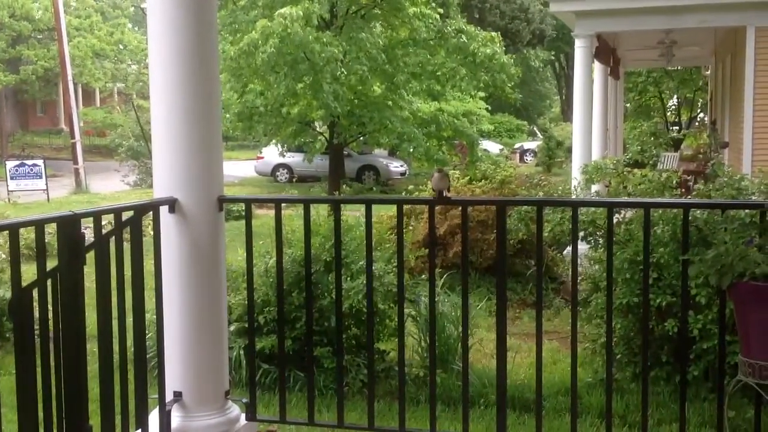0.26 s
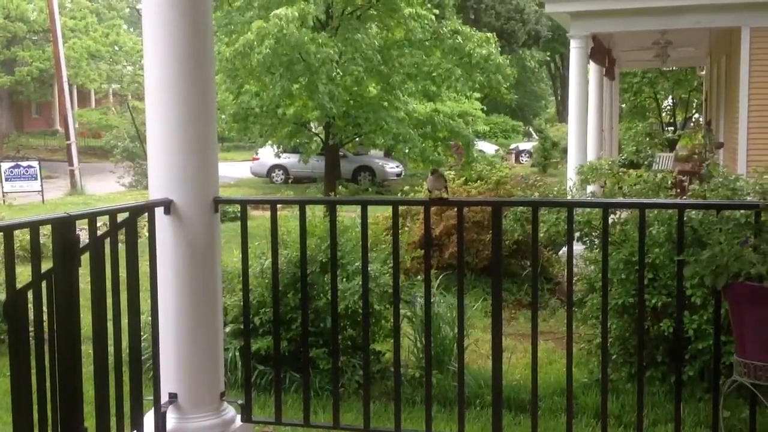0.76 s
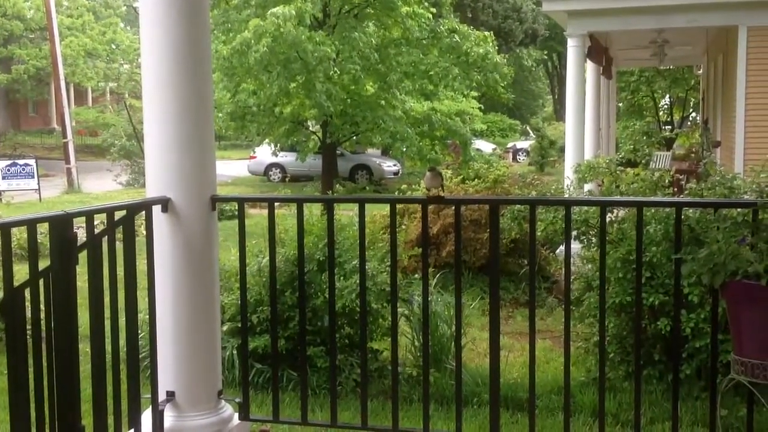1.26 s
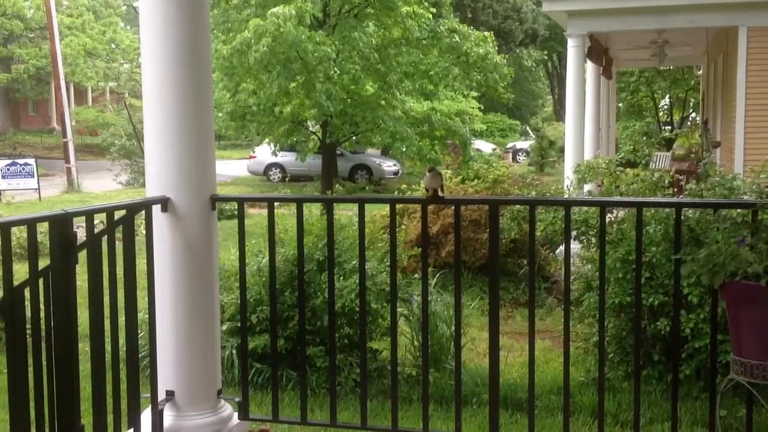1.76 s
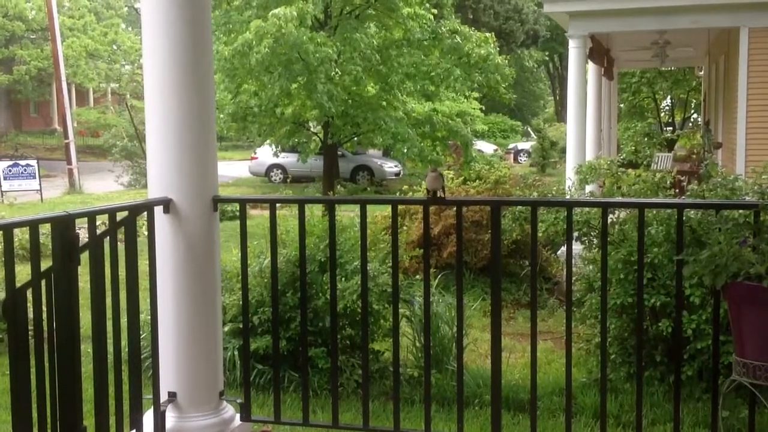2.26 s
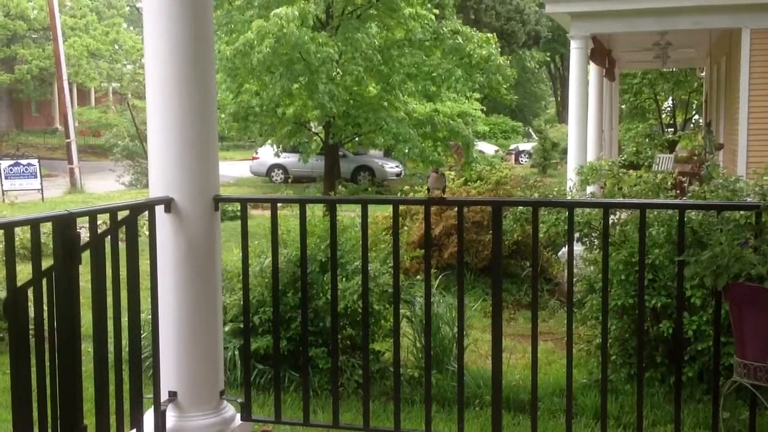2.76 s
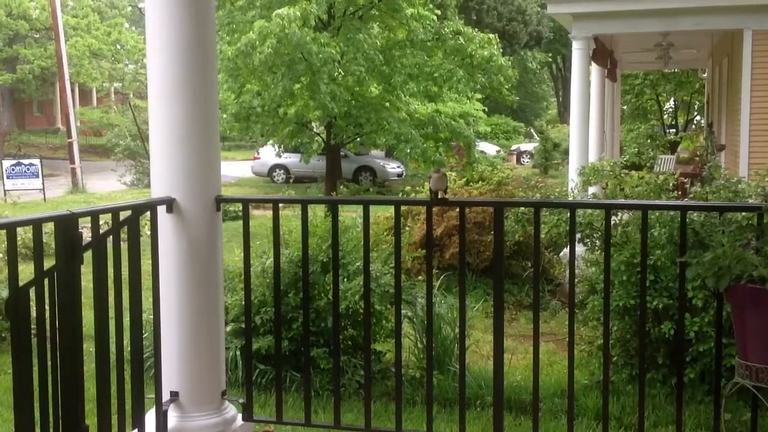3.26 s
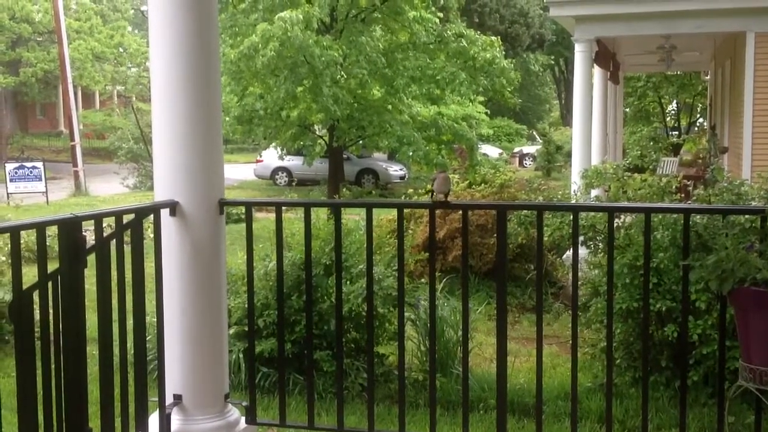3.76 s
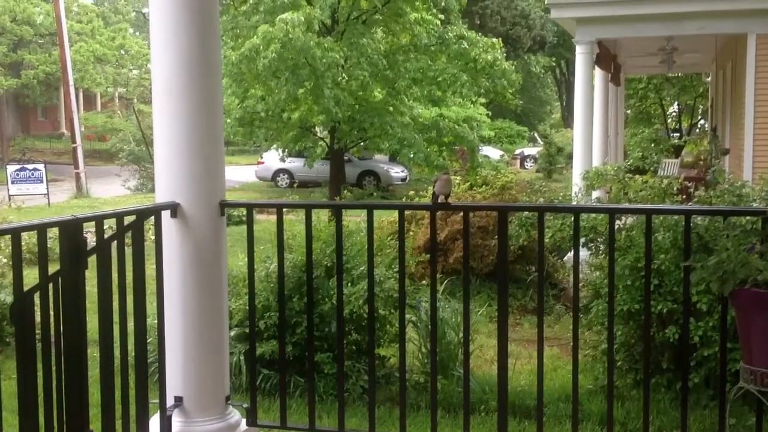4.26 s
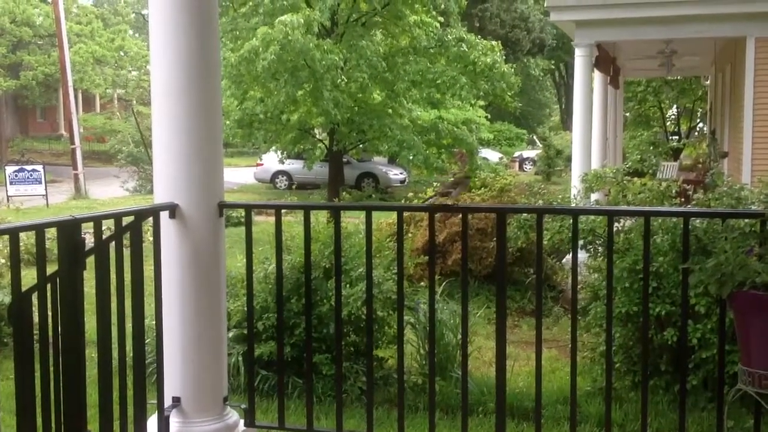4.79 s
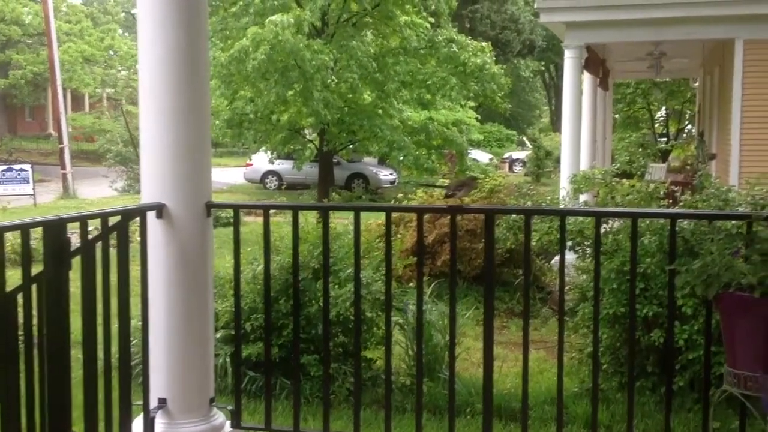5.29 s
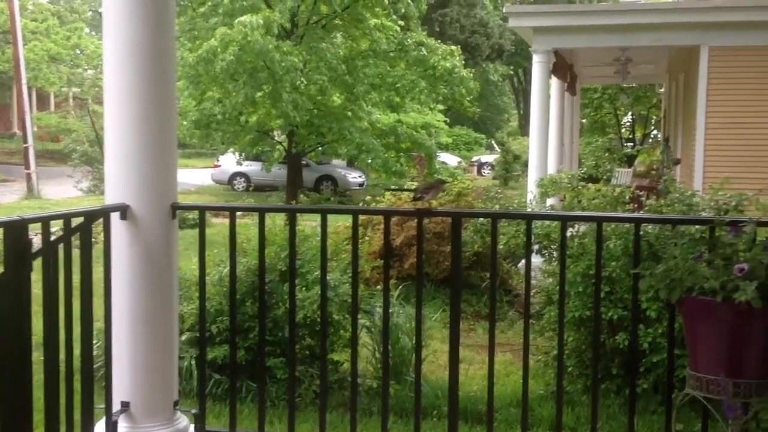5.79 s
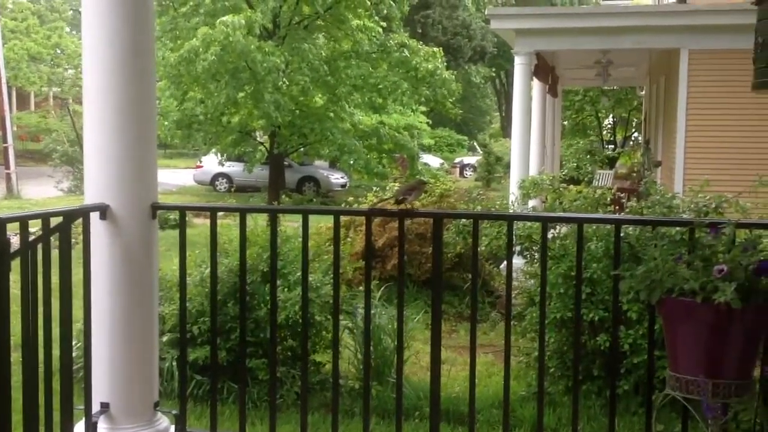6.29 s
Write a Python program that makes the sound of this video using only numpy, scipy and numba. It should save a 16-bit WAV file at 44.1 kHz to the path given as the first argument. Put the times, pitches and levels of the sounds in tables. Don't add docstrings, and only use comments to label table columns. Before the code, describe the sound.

A mockingbird a few metres away scolds with six harsh falling rasps over soft suburban hum, faint far birdsong and small camera ticks.

```python
import sys
import numpy as np
from scipy import signal
from scipy.fft import rfft, irfft
from scipy.io import wavfile
from scipy.ndimage import uniform_filter1d
from numba import njit

SR = 44100
rng = np.random.default_rng(int(sys.argv[2]) if len(sys.argv) > 2 else 0)


def undo_db(level):
    steps = np.asarray(level, float) / 20
    return 10 ** steps


def unload_audio(sound):
    columns = np.transpose(np.atleast_2d(sound))
    steps = np.round(np.clip(columns, -1, 1) * 32767)
    wavfile.write(sys.argv[1], SR, steps.astype(np.int16))


N = 288414


def level(x, rms_db):
    return x * undo_db(rms_db) / np.sqrt(np.mean(x ** 2))


def colour(x, spectrum):
    hz, db = np.transpose(spectrum)
    bins_hz = np.arange(len(x) // 2 + 1) * SR / len(x) + 1
    gain = undo_db(np.interp(np.log(bins_hz), np.log(hz), db))
    return irfft(rfft(x) * gain, len(x))


def walk(rate_hz, count):
    k = max(int(SR / rate_hz), 1)
    return level(uniform_filter1d(uniform_filter1d(rng.standard_normal(count), k), k), 0)


def turns(hz):
    return 2 * np.pi * np.cumsum(hz) / SR


def bouts(rows, calm_db):
    t = np.arange(N) / SR
    power = undo_db(2 * calm_db)
    for s, spread_s, db in rows:
        power = power + undo_db(2 * db) * np.exp(-((t - s) / spread_s) ** 2)
    return np.sqrt(power)


def echo(x, t60_s, db, dull_hz):
    t = np.arange(SR) / SR
    noise = rng.standard_normal(SR)
    low = signal.lfilter(*signal.butter(2, dull_hz, fs=SR), noise)
    tail = low + (noise - low) * np.exp(-t / 0.051)
    tail = tail * undo_db(-60 * t / t60_s) * np.clip(t / 0.0043, 0, 1)
    return signal.fftconvolve(x, tail * undo_db(db) / np.sqrt(np.sum(tail ** 2)))[:N]


# f/Hz, level/dB per Hz
HUM = [(18, -75), (30, -44), (148, -2), (640, -4), (900, -7), (2600, -11.5), (5170, -19.5), (15500, -29)]
# t/s, spread/s, level/dB
LEAVES = [
    (.52, .04, -67),
    (1.42, 0.11, -73),
    (3.93, 0.083, -63),
    (5.05, .25, -68),
    (6.35, .2, -68),
]


def suburb():
    spectrum = rfft(colour(rng.standard_normal(N), HUM))
    bins_hz = np.arange(N // 2 + 1) * SR / N
    swell = walk(7.5, N)
    hum = 0
    for low_hz in 25 * 2 ** np.arange(0, 10):
        band = irfft(spectrum * ((bins_hz >= low_hz) & (bins_hz < 2 * low_hz)), N)
        hum = hum + band * undo_db(0.21 * swell + 1.42 * walk(8.1, N))
    leaves = colour(rng.standard_normal(N), [(1500, -22), (4000, 11), (9000, 0), (15000, 4)])
    return level(hum, -57.5) + level(leaves, 0) * bouts(LEAVES, calm_db=-77.5)


# t/s, spread/s, level/dB
CHORUS = [
    (0, 0.044, -61.5),
    (.9, 0.54, -68.5),
    (3.2, 0.57, -62),
    (4.35, 0.091, -71),
    (6.54, 0.52, -60),
]


def far_chorus():
    spectrum = [(900, -26), (1600, 7.5), (2500, -20.5), (3600, 2.0), (4500, -7.0), (6000, -23)]
    wash = level(colour(rng.standard_normal(N), spectrum), 0)
    return wash * bouts(CHORUS, calm_db=-86.5) * undo_db(0.47 * walk(1.3, N))


# t/s, length/s, first f/Hz, last f/Hz, level/dB
CLEAR_NOTES = [(1.351, 0.077, 3160, 4270, -54.5), (1.363, .06, 3950, 4580, -55),
               (0.133, .61, 7120, 6410, -74.5), (1.389, 0.058, 2520, 2900, -56),
               (1.409, .027, 2200, 2300, -48.5), (2.187, 0.087, 3754, 3910, -66),
               (2.375, .036, 7900, 7800, -70), (5.038, 0.072, 3000, 3520, -55.5),
               (5.05, 0.055, 2610, 2500, -52.5), (5.116, 0.032, 4000, 3970, -61),
               (5.753, 0.044, 3615, 3524, -44.5), (5.79, 0.025, 2065, 1890, -49),
               (5.826, 0.056, 2614, 2594, -46), (5.935, .04, 2570, 2620, -70)]
# t/s, length/s, first f/Hz, last f/Hz, level/dB
BURRED_NOTES = [(0, 0.03, 3440, 3420, -55), (4.983, .028, 6500, 6390, -66),
                (5.029, .038, 5000, 5560, -59.5), (5.742, 0.03, 4250, 5000, -64),
                (5.758, .045, 3185, 2915, -52), (5.772, 0.065, 3600, 2665, -47.5),
                (5.887, .073, 4100, 4600, -63), (5.927, 0.062, 4400, 3900, -56),
                (5.955, .025, 3470, 3330, -65)]


def single_notes():
    clear_rough, burred_rough = 0.21, 0.86
    return [(*r, clear_rough) for r in CLEAR_NOTES] + [(*r, burred_rough) for r in BURRED_NOTES]


def whistle(length_s, first_hz, last_hz, db, rough):
    warble_hz, attack_s = 16, .006
    u = np.arange(int(length_s * SR)) / (length_s * SR)
    n = len(u)
    burr, waver, warble = walk(1200, 30000)[:n], walk(103, 30000)[:n], walk(120, 30000)[:n]
    rough = np.clip(rough, 0, 1)
    hz = first_hz + (last_hz - first_hz) * np.clip(1.6 * u, 0, 1) + warble_hz * warble
    swell = np.clip(u / max(0.088, attack_s / length_s), 0, 1) * (1 - u ** 3)
    swell = swell * undo_db(3.1 * min(length_s / 0.065, 1) * waver)
    tremor = np.sqrt(1 - rough ** 2) + rough * burr
    return np.sqrt(2) * undo_db(db) * swell * tremor * np.sin(turns(hz))


def songbirds():
    dry = np.zeros(N)
    for start_s, *note in single_notes() + churrs() + warbler() + piper():
        song = whistle(*note)
        i = int(start_s * SR)
        dry[i:i + len(song)] += song
    nearer_from_s, nearer_echo_db = 4.9, -8
    sent = dry * np.where(np.arange(N) / SR > nearer_from_s, undo_db(nearer_echo_db), 1)
    return dry + echo(sent, t60_s=0.71, db=-1.5, dull_hz=11700)


# t/s, peak level/dB, f/Hz, width/Hz
TICKS = [
    (0.513, -43, 2950, 5000),
    (1.585, -68, 46.1, 60),
    (2.365, -38, 5300, 1800),
    (3.674, -45, 403, 200),
    (6.422, -36.5, 2320, 892),
    (6.422, -40, 6060, 1200),
    (6.422, -53, 11070, 6000),
    (6.492, -41, 210, 70.6),
]


def camera():
    out = np.zeros(N + 4096)
    t = np.arange(4096) / SR
    for s, peak_db, hz, width_hz in TICKS:
        scrape = rng.standard_normal(4096) * np.exp(-t / 0.00067)
        mode = np.sin(2 * np.pi * hz * t) * np.exp(-np.pi * width_hz * t)
        ring = np.convolve(scrape[:300], mode)[:4096]
        ring = signal.lfilter(*signal.butter(2, [.65 * hz, 1.3 * hz], "band", fs=SR), ring)
        i = int(s * SR)
        out[i:i + 4096] += undo_db(peak_db) * ring / np.abs(ring).max()
    return out[:N]


@njit
def svf(x, hz, width_hz):
    y, b, l = np.empty(len(x)), 0., 0.
    for i in range(len(x)):
        g, k = np.tan(np.pi * hz[i] / SR), width_hz / hz[i]
        v = (b + g * (x[i] - l)) / (1 + g * (g + k))
        b, l, y[i] = 2 * v - b, l + 2 * g * v, k * v
    return y


def turned(spectrum, stretch, tilt_db, pivot_hz):
    return [(hz * stretch, db + tilt_db * np.log2(hz / pivot_hz)) for hz, db in spectrum]


def breath_db(age_s, length_s, peak_db, fade_db_per_s):
    swell_s, swell_db, close_s, close_db = 0.031, 7, 0.018, 10
    db = peak_db - swell_db * np.clip(1 - age_s / swell_s, 0, 1)
    db = db - fade_db_per_s * np.clip(age_s - swell_s, 0, None)
    return db - close_db * np.clip(1 - (length_s - age_s) / close_s, 0, 1)


def syrinx(hz, age_s, length_s, jitter):
    flutter_hz, flutter_depth, flutter_wander, hiss_db = 232.16, 1.4, 0.0593, 1.5
    n = len(hz)
    phase = turns(hz * (1 + jitter * walk(254, n)))
    flutter = turns(flutter_hz * (1 + flutter_wander * (walk(26.4, n) + walk(148.0, n))))
    partials = np.arange(1, 17)[:, None]
    swing = flutter_depth * np.sqrt(partials) * np.sin(flutter + partials)
    shaken = np.cos(partials * phase + swing).sum(0)
    clear = np.cos(partials * phase).sum(0) * undo_db(3.3 * walk(48, n))
    hiss = rng.standard_normal(n) * (1 + .5 * np.cos(flutter))
    clear_db = -6 + 5.5 * age_s / length_s
    return level(shaken, 0) + level(hiss, hiss_db) + undo_db(clear_db) * level(clear, 0)


# f/Hz, level/dB per Hz
THROAT = [(410, -51), (720, -28), (1000, -17), (2300, -11), (2900, -6), (3900, -1.5), (5100, -5),
          (7200, -18.5)]
# f/Hz, level/dB per Hz
BEAK = [(6000, -7), (7200, -8.5), (8800, 2.5), (11000, -12.5), (13500, -6.5), (15500, -5.5)]


def rasp(row, pitch, turn, rings):
    start_s, length_s, peak_db, fade_db_per_s, first_db = row
    stretch, tilt_db, upper_db, treble_db, beak_tilt_db = turn
    upper_throat_hz, split_hz, jitter = 5500, 7000, 0.01205
    age_s = np.arange(int(length_s * SR)) / SR
    n = len(age_s)
    hz = np.interp(start_s + age_s, *np.transpose(pitch))
    source = syrinx(hz, age_s, length_s, jitter)

    voice = colour(source, turned(THROAT, stretch, tilt_db, 3000))
    voice = colour(voice, [(0.85 * upper_throat_hz, 0), (0.97 * upper_throat_hz, upper_db)])
    for ring_hz, gain_db in np.reshape(rings, (2, 2)):
        drift_hz = ring_hz * (1 + 0.0017 * walk(20, n))
        voice = voice + undo_db(gain_db) * svf(voice, drift_hz, 190.0)
    body = signal.sosfilt(signal.butter(4, split_hz, fs=SR, output="sos"), voice)

    bright = colour(source, turned(BEAK, 0.98, beak_tilt_db, 9000))
    treble = signal.sosfilt(signal.butter(4, split_hz, "high", fs=SR, output="sos"), bright)

    steady = turns(hz * (1 + 1.64 * jitter * walk(88, n)))
    octave = undo_db(4.2 * walk(28, n)) * np.cos(2 * steady)
    lines = undo_db(first_db + 2.5 * walk(36, n)) * (np.cos(steady) + octave)

    forceful_db, slowing, attack_s = -24.5, 0.92, .011
    slower = undo_db(slowing * (forceful_db - peak_db))
    edge = np.clip(np.minimum(age_s / slower, length_s - age_s) / attack_s, 0, 1)
    gain = edge * undo_db(breath_db(age_s, length_s, peak_db, fade_db_per_s))
    return gain * (level(body, 0) + lines + undo_db(treble_db) * level(treble, 0))


# t/s, length/s, peak level/dB, fade/dB per s, fundamental level/dB
RASPS = [
    (.722, 0.27, -26, 27.5, -26),
    (1.490, 0.26, -27.5, 38.5, -22.5),
    (2.489, .276, -28.5, 24.5, -19),
    (4.536, 0.3, -25, 29, -18.5),
    (5.15, 0.28, -28, 20, -28),
    (6.031, 0.22, -27.5, 44.5, -23),
]
# t/s, f/Hz
PITCH = [
    [(.72, 1024), (.98, 909.6)],
    [(1.49, 946), (1.62, 901), (1.65, 837), (1.75, 789.4)],
    [(2.5, 936.6), (2.6, 899), (2.63, 785), (2.76, 781)],
    [(4.54, 1204), (4.6, 1105), (4.63, 995), (4.7, 939), (4.83, 905)],
    [(5.15, 983.3), (5.43, 878.4)],
    [(6.03, 961), (6.15, 923.7), (6.26, 801)],
]
# throat stretch, throat tilt/dB per octave, upper throat/dB, beak/dB, beak tilt/dB per octave
TURNS = [(1.006, -0.6, 0, -15.5, -0.5), (0.96, -0.1, 2, -16.5, 2), (1.007, -0.6, 0, -16, 0),
         (0.93, 2, -7, -17.5, -8), (1.006, -1.1, -1.5, -16, -8), (1.048, -1.5, -0.5, -15, -5)]
# f/Hz, level/dB, f/Hz, level/dB
RINGS = [(3420, -3.5, 3800, -9), (2850, -26, 3000, -19), (2710, -35, 3500, -26), (2950, -18, 4700, 1),
         (2740, 1.5, 4750, 0), (2780, -0.5, 1700, -14)]


def mockingbird():
    dry = np.zeros(N)
    for row, pitch, turn, rings in zip(RASPS, PITCH, TURNS, RINGS):
        call = rasp(row, pitch, turn, rings)
        i = int(row[0] * SR)
        dry[i:i + len(call)] = call
    thin = signal.lfilter(*signal.butter(2, 1700, "high", fs=SR), dry)
    porch = echo(thin, t60_s=0.2, db=0, dull_hz=12500)
    street = echo(thin, t60_s=0.62, db=-15.5, dull_hz=5800)
    return undo_db(-1.5) * (dry + porch + street)


# t/s, length/s, level/dB
CHURRS = [
    (1.197, .095, -58.5),
    (4.244, .1, -58),
]


def churrs():
    first_hz, fall, low_db, rough = 4100, .79, -4, 0.71
    rows = []
    for s, length_s, db in CHURRS:
        rows.append((s, length_s, first_hz, first_hz * fall, db, rough))
        rows.append((s, length_s, first_hz / 2, first_hz * fall / 2, db + low_db, rough))
    return rows


# delay/s, length/s, first f/Hz, last f/Hz, roughness 0-1
PHRASE = [
    (0, .11, 4050, 4570, 0),
    (.05, 0.069, 4220, 4225, 0.5),
    (0.109, .115, 2366, 2940, 0.02),
    (.155, 0.053, 3540, 3360, 0.7),
    (.16, .165, 2400, 2470, .7),
    (0.241, 0.0382, 2156, 1894, 0.46),
]
# t/s, level/dB
PHRASE_AT = [
    (2.806, -58),
    (3.238, -57.5),
]


def warbler():
    rows = []
    for s, db in PHRASE_AT:
        for delay_s, length_s, first_hz, last_hz, rough in PHRASE:
            rows.append((s + delay_s, length_s, first_hz, last_hz, db, rough))
    return rows


# lead-in t/s, first pip t/s, f/Hz, level/dB
PIPER = [
    (3.098, 3.128, 3546, -41.5),
    (3.539, 3.586, 3553, -44.5),
]


def piper():
    fall_hz, lead_db, pip_s, gap_s, fade_db = 70, -7.5, 0.018, 0.015, 2.5
    rows = []
    for lead_s, first_s, hz, db in PIPER:
        rows.append((lead_s, first_s - lead_s, hz + fall_hz, hz, db + lead_db, 0))
        for k in range(3):
            top_hz = hz - k * fall_hz / 4
            rows.append((first_s + k * gap_s, pip_s, top_hz, top_hz - fall_hz / 4, db - k * fade_db, 0))
    return rows


def scene():
    return (suburb() + far_chorus() + songbirds() + camera() + mockingbird())[None]


def roll_off(x):
    return signal.sosfilt(signal.butter(12, 15650, fs=SR, output="sos"), x)


def record(dry):
    mix = signal.sosfilt(signal.ellip(8, .2, 60, 15380, fs=SR, output="sos"), dry)
    return roll_off(mix)


dry = scene()
out = record(dry)
unload_audio(out)
```